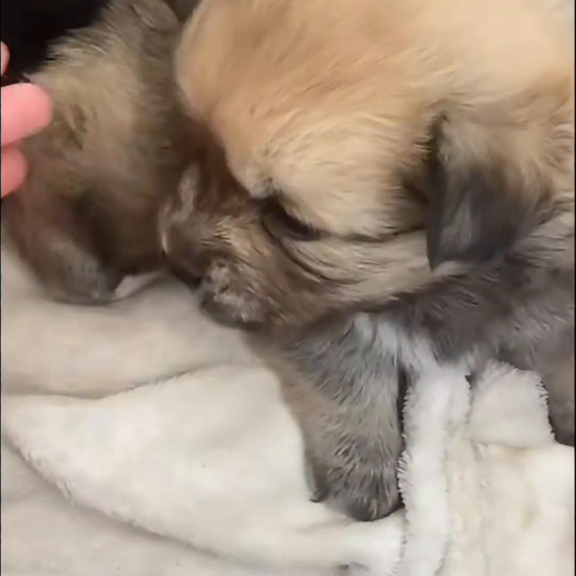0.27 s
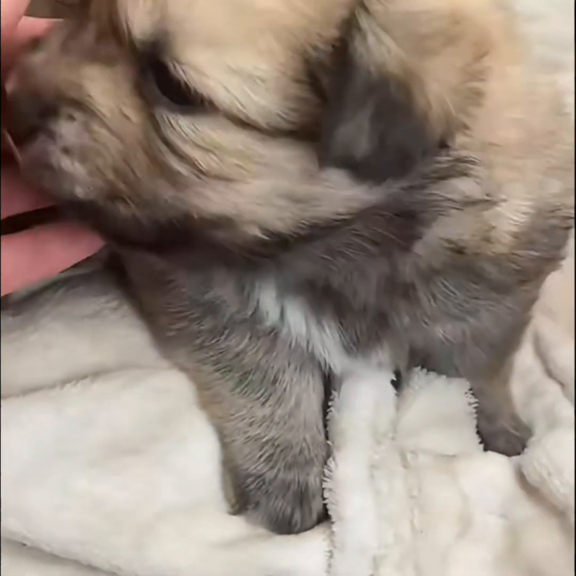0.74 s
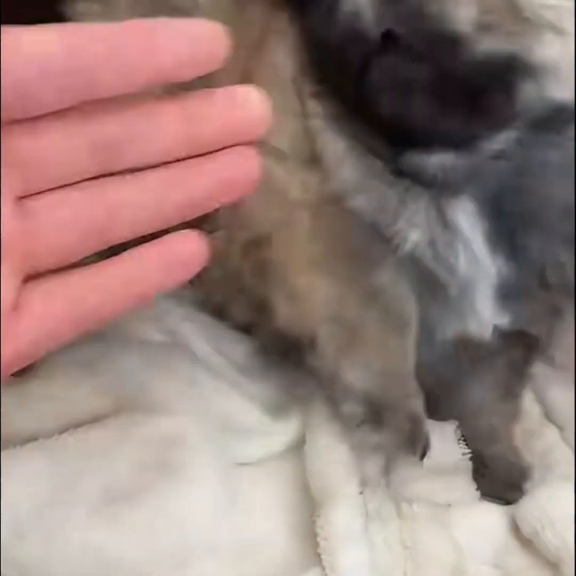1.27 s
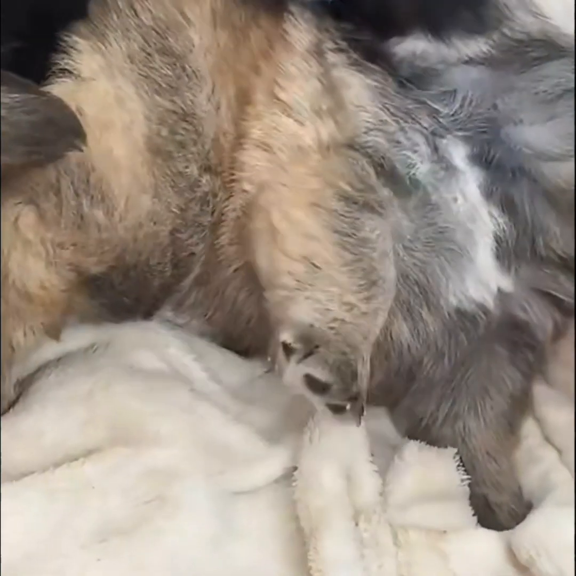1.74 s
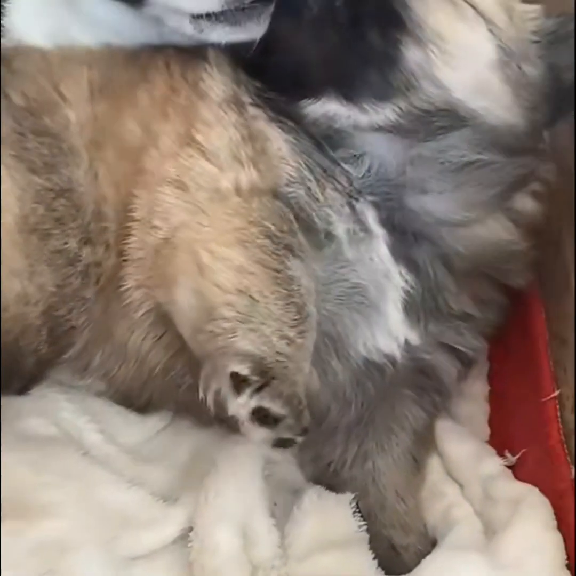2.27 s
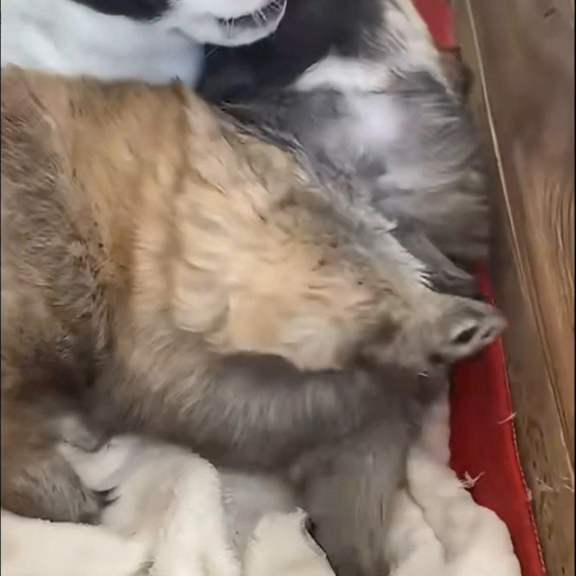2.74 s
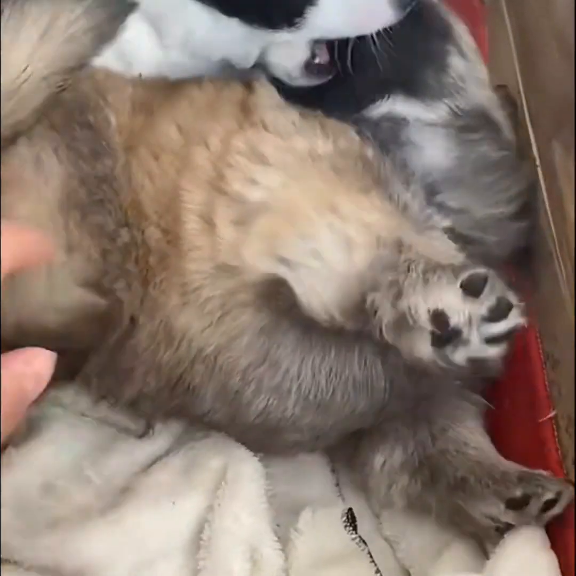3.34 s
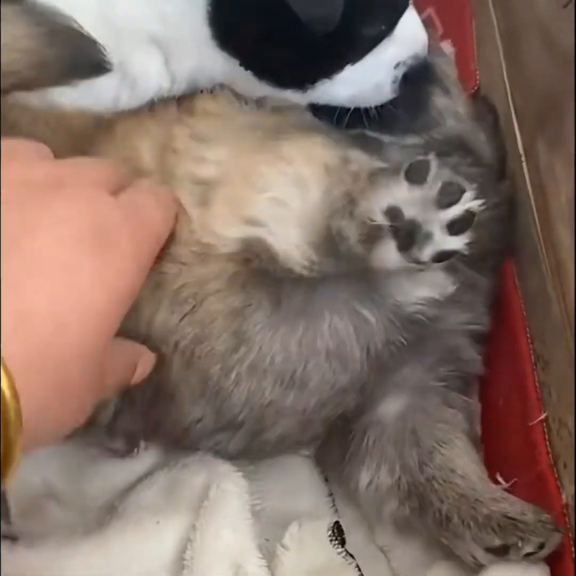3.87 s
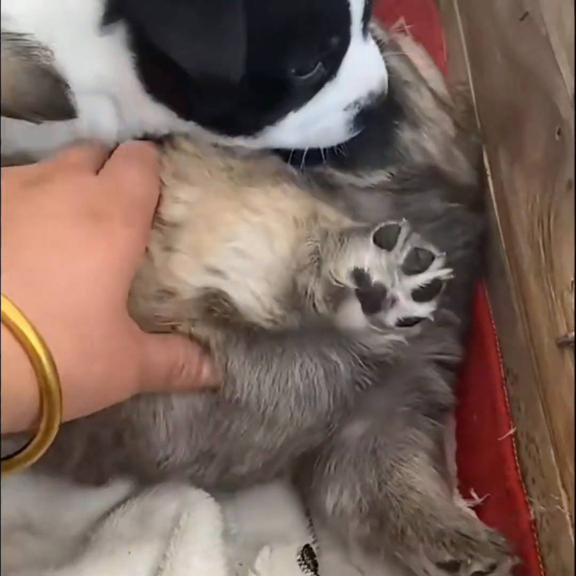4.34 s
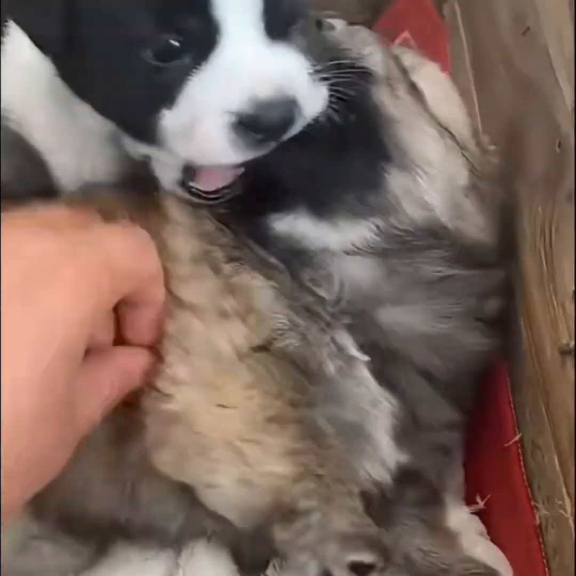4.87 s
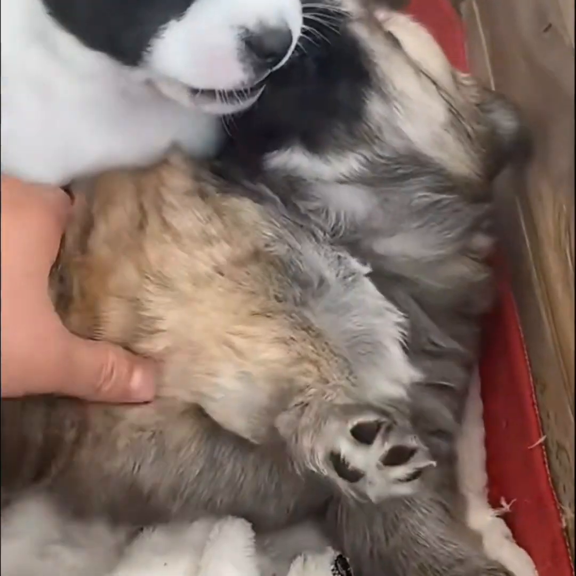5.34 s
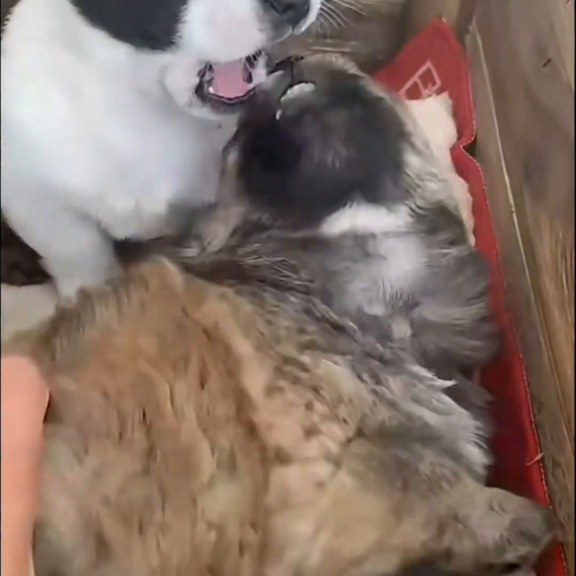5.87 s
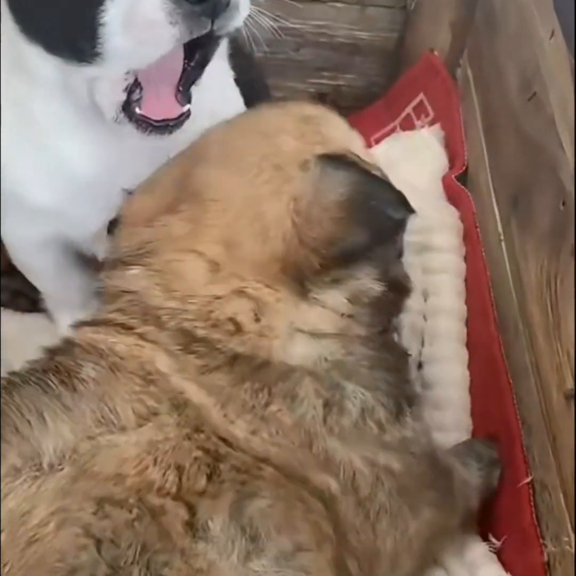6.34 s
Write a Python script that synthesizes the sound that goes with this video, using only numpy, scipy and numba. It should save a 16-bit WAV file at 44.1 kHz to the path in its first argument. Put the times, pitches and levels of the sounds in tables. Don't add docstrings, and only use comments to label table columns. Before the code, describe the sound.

Rapid low puppy growls, raspy and pulsing, repeat about three times a second in a small room, with soft grunts, ticks and cloth scuffs.

```python
import sys
import numpy as np
from scipy import signal
from scipy.fft import rfft, irfft, next_fast_len
from scipy.io import wavfile
from scipy.ndimage import uniform_filter1d, map_coordinates
from numba import njit

SR = 44100
rng = np.random.default_rng(int(sys.argv[2]) if len(sys.argv) > 2 else 0)


def attenuation_scalar(level_db):
    decades = np.asarray(level_db, float) / 20
    return 10 ** decades


def store_wav(level_fs):
    pcm = np.round(np.clip(np.atleast_2d(level_fs), -1, 1) * 32767)
    wavfile.write(sys.argv[1], SR, pcm.T.astype(np.int16))


N = 290619

# (frequency [Hz], level [dB per Hz])
HUM_COLOUR = [(15, -48.5), (25, 3), (193, 0.5), (297, -12.5), (920, -42.5), (1140, -37.5), (2240, -36.5),
              (4150, -48), (4750, -65.5), (5580, -46.5), (8590, -55), (10100, -47), (15500, -77.5)]
# (time [s], level [dB])
HUM_LEVEL = [(0.0, -46.5), (0.09, -37.5), (0.66, -43), (0.79, -59), (1.34, -43.5), (6.59, -46.5)]
# (start [s], length [s], level [dB], centre [Hz])
PAW_SHIFTS = [
    (0.189, 0.034, -43, 4000),
    (0.282, 0.06, -41, 2500),
    (3.044, 0.13, -30.5, 4000),
    (6.02, .15, -39.5, 8000),
]
# (time [s], mouth ring [dB], chest thump [dB])
GRUNT_PULSES = [(0.03, -26, -13.5), (0.101, -14.5, -6.5), (0.141, -23.5, -20), (0.165, -27, -22),
                (0.193, -11.5, -15), (.216, -4, -16), (.238, -28, -19.5), (0.276, -19, -21.5),
                (.298, -13, -20), (0.315, -13, -17), (0.337, -18, -29), (0.398, -18.5, -16),
                (0.42, -22.5, -21), (0.433, -21, -7.5), (0.609, -9.5, -14.5), (0.635, -34, -20),
                (0.652, -38, -31), (.676, -34, -30), (0.706, -20, -38), (.73, -38, -24), (1.881, -4, -12.5),
                (1.915, -6.5, -15.5), (1.95, -3, -15.5), (1.987, -8, -6), (2.797, -28, -32),
                (2.857, -23.5, -27), (2.958, -36.5, -26), (2.996, -25.5, -21.5), (3.773, -19, -13.5),
                (4.681, -23.5, -22)]
# (time [s], peak above 3 kHz [dB], body relative to peak [dB])
SMACKS_AND_TICKS = [(0.189, -28.5, 3.5), (0.61, -44.5, 13), (0.7025, -43.5, 0), (0.9876, -36, 21.5),
                    (0.9987, -50.5, 32.5), (1.0209, -34, 19), (1.211, -19.5, 1), (1.3629, -17, 1),
                    (1.3815, -25.5, 9.5), (1.8424, -28, -4.5), (1.877, -30, -1), (2.2064, -45, 8.5),
                    (2.5503, -28, -45), (2.573, -34.5, 1), (2.846, -43, -7), (3.269, -36.5, 15),
                    (3.3102, -39.5, 16.5), (3.3269, -37.5, 14.5), (3.3527, -35.5, -1), (3.7454, -53, 24),
                    (3.7682, -39, 15), (3.7896, -29, 10.5), (3.8062, -26, 7), (5.4948, -49.5, 15)]
# (start [s], swell [s], length until the push ends [s], chest tone [dB], top pitch [Hz])
GROWL_BURSTS = [(.39, .14, 0.19, -20.5, 254.5), (.757, 0.059, 0.16, -14, 175),
                (1.086, .115, .13, -8.5, 214.8), (1.205, .035, .11, -14.5, 238.4),
                (1.492, 0.046, 0.24, -10, 212.1), (1.9, 0.042, .13, -16, 197.4),
                (2.31, .09, 0.15, -12.5, 200.3), (2.626, 0.041, 0.083, -15.5, 190),
                (3.025, 0.096, 0.17, -12.5, 199.2), (3.393, 0.16, 0.25, -11, 200.5),
                (3.862, .05, .17, -12.5, 236.7), (4.04, 0.072, 0.12, -14, 233.1),
                (4.366, .08, .17, -13.5, 222), (4.71, .06, 0.16, -15, 272.3), (5.082, 0.11, 0.2, -13, 198),
                (5.55, 0.13, 0.21, -12.5, 215), (5.941, .03, 0.13, -15.5, 199.1),
                (6.332, .06, .2, -19, 180)]
# (first pitch [Hz], throat [dB], mouth [dB], breath [dB], lips relative to mouth [dB])
GROWL_VOICES = [(249.25, -35, -43.5, -56, -27), (215, -32.5, -24.5, -48, -31.5),
                (194.4, -21, -20.5, -35.5, -20.5), (222, -18.5, -19.5, -34, -3.5),
                (205.5, -21, -26, -43.5, -13), (175, -23.5, -40.5, -48.5, -34),
                (170.8, -21, -37, -44.5, -7), (180, -22.5, -31.5, -50.5, -10.5),
                (215, -20, -36, -38, -22.5), (190, -20.5, -25.5, -44.5, -20),
                (251.5, -16.5, -20, -38, -13.5), (205.5, -16, -20, -32, -7), (204.7, -15.5, -27, -35, -9),
                (226.1, -15.5, -13.5, -31, -15.5), (190, -19, -33.5, -47.5, -35),
                (203.9, -15.5, -24.5, -40, -2.5), (197, -17.5, -25.5, -38.5, -31),
                (159.4, -28.5, -38.5, -58.5, -48)]
# (frequency [Hz], level [dB per Hz])
BREATH_COLOUR = [(1760, -25), (3000, -2), (3240, 6), (4440, -3), (5060, -4.5), (5730, -1), (6390, -8.5),
                 (7700, -17), (8590, -15.5), (10100, -16.5), (15500, -33)]
# (start [s], length [s], level [dB], first resonance [Hz], last resonance [Hz])
LIP_WHEEZE = (1.495, .24, -37, 4500, 3200)
# (frequency [Hz], lead [radians])
LEFT_LEAD = [(200, .12), (400, .4), (700, .6), (1300, .25), (2500, 1.1), (5000, 1.2), (9000, 1.4),
             (14000, .8)]
# (frequency [Hz], left minus right [dB])
LEFT_TILT = [(200, .5), (700, 2.5), (1400, -.5), (2500, -4), (5000, -.5)]
# (frequency [Hz], level [dB])
WALL_SCATTER = [(300, -30), (700, -19), (1400, -22), (3000, -9), (10000, -6)]
# (frequency [Hz], time to fall 60 dB [s])
ROOM_DECAY = [(150, 0.81), (800, 0.48), (2500, 0.38), (10000, 0.12)]

# (start below top [dB], sag by the push's end [dB], drop as it ends [dB], fade [dB per s])
TONE_SHAPE, THROAT_SHAPE = (8.3, 4.64, 2.7, 154), (2.7, 4.6, 11.8, 190)
MOUTH_SHAPE, BREATH_SHAPE = (3, 6, 8, 130), (6, 3.4, 9.12, 96)
ATTACK_S, DROP_S = .014, .0098
REST_HZ, SLACK, SETTLE_S = 164.06, .45, .09
ROUGH = .35


def unit(x):
    return x / np.sqrt(np.mean(x ** 2) + 1e-20)


def even(x, seconds=0.046):
    size = max(int(seconds * SR), 1)
    power = uniform_filter1d(uniform_filter1d(x * x, size), size)
    return x / np.sqrt(np.abs(power) + 1e-12)


def soft(x):
    return uniform_filter1d(x, round(ATTACK_S * SR))


def along(points, hz):
    f, v = np.transpose(points)
    return np.interp(np.log(hz + 1), np.log(f + 1), v)


def wobble(rate):
    knots = rng.standard_normal(int(N * rate / SR) + 4)
    return map_coordinates(knots, [np.arange(N) * rate / SR])


def filtered(x, response):
    m = next_fast_len(N + SR // 2)
    return irfft(rfft(x, m) * response(np.fft.rfftfreq(m, 1 / SR)), m)[..., :N]


def band(x, low_hz, high_hz, order=4):
    return signal.sosfilt(signal.butter(order, [low_hz, high_hz], "band", fs=SR, output="sos"), x)


@njit
def resonate(x, turn, keep):
    y = np.zeros(len(x))
    for i in range(2, len(x)):
        y[i] = x[i] + 2 * keep * np.cos(turn[i]) * y[i - 1] - keep * keep * y[i - 2]
    return y


def cavity(x, hz, width_hz):
    return resonate(x, 2 * np.pi * hz / SR, np.exp(-np.pi * width_hz / SR))


def box(x):
    t = np.arange(SR // 40) / SR
    walls = attenuation_scalar(-60 * t / .03) * rng.standard_normal((2, len(t)))
    walls = walls / np.linalg.norm(walls[0])
    first, second = signal.fftconvolve(x[None], walls, axes=1)[:, :N]
    turn = 3 * wobble(7)
    return x + np.cos(turn) * first + np.sin(turn) * second


def floor():
    s, db = np.transpose(HUM_LEVEL)
    noise = rng.standard_normal((2, N))
    mid, side = filtered(noise, lambda f: attenuation_scalar(along(HUM_COLOUR, f)) / (1 + (52 / (f + 1)) ** 4))
    level_db = np.interp(np.arange(N) / SR, s, db) + 9.5
    lumps = attenuation_scalar(level_db + 1.3 * wobble(7.1) + 0.5 * wobble(3.54))
    return lumps * unit(np.array([mid + 0.031 * side, mid - 0.031 * side]))


def fibres(hz):
    noise = band(rng.standard_normal((2, N)), hz / 3, min(hz * 1.4, 16000), order=1)
    return unit(noise * attenuation_scalar(0.85 * wobble(90) + 0.67 * wobble(24)))


def bedding():
    t = np.arange(N) / SR
    shifts = np.zeros((2, N))
    for s, length, db, hz in PAW_SHIFTS:
        swell = np.sin(np.pi * np.clip((t - s) / length, 0, 1))
        shifts += attenuation_scalar(db) * swell * fibres(hz)
    settling = attenuation_scalar(-57.5 - 32.5 * t + 4 * wobble(10)) * (t < 0.93)
    return shifts + settling * fibres(4500)


def grunts():
    out, t = np.zeros(N + SR), np.arange(SR // 10) / SR
    rise = np.sin(np.pi / 2 * np.minimum(t / 0.006, 1)) ** 2
    fall = 85 * t + 480 * .007 * (1 - np.exp(-t / .007))
    thump = attenuation_scalar(-60 * t / 0.085) * np.sin(2 * np.pi * fall)
    ring_hz = 545 * (1 + .04 * rng.standard_normal(len(GRUNT_PULSES)))
    for (s, db, thump_db), hz in zip(GRUNT_PULSES, ring_hz):
        ring = np.sin(2 * np.pi * hz * t) + 0.17 * np.sin(2 * np.pi * 1.273 * hz * t)
        ring = attenuation_scalar(-60 * t / 0.019) * ring
        pulse = rise * (attenuation_scalar(db + 13.5) * ring + attenuation_scalar(thump_db) * thump)
        out[round((s - .002) * SR):][:len(t)] += pulse
    return out[:N]


def ticks():
    edge, body, t = np.zeros(N + SR), np.zeros(N + SR), np.arange(SR // 30) / SR
    noises = rng.standard_normal((len(SMACKS_AND_TICKS), len(t)))
    for (s, db, body_db), noise in zip(SMACKS_AND_TICKS, noises):
        puff = attenuation_scalar(db - 60 * t / 0.011) * (1 - np.exp(-t / 0.0008)) * noise
        edge[round(s * SR):][:len(t)] += puff
        body[round(s * SR):][:len(t)] += attenuation_scalar(body_db) * puff
    bright = attenuation_scalar(11.5) * band(edge[:N], low_hz=3200, high_hz=8360, order=2)
    dull = attenuation_scalar(17.0) * band(body[:N], low_hz=1200, high_hz=3080, order=2)
    return bright + dull


def fold_snaps(cycles, half):
    chance = rng.standard_normal((2000, 2))[:int(cycles[-1])]
    at = np.searchsorted(cycles, np.arange(len(chance)) + .6).clip(0, N - 1)
    size = attenuation_scalar(8 * ROUGH * chance[:, 0]) * (1 - half[at] * (np.arange(len(at)) % 2))
    late = (ROUGH * .0006 * SR * chance[:, 1]).astype(int)
    snaps = np.bincount(np.clip(at + late, 0, N - 1), size, N)
    return snaps + .55 * np.roll(snaps, round(.0023 * SR))


def growl():
    t = np.arange(N) / SR
    rows = np.hstack([GROWL_BURSTS, GROWL_VOICES])
    which = np.searchsorted(rows[:, 0], t) - 1
    now = rows[np.maximum(which, 0)].T
    start, rise, length, top_db, top_hz, first_hz, throat_db, mouth_db, breath_db, lip_db = now
    age = t - start
    before = np.clip(1 - age / rise, 0, 1)
    after = np.clip((age - rise) / np.maximum(length - rise, .01), 0, 1)
    over = np.maximum(age - length, 0)

    def gain(db, under, sag, drop, fade):
        db = db - under * before ** 2 - sag * after ** 2
        db = db - drop * (1 - np.exp(-over / DROP_S)) - fade * over
        return soft((which >= 0) * attenuation_scalar(db))

    tense = (1 - SLACK * after) * np.exp(-over / SETTLE_S)
    hz = soft(REST_HZ + (top_hz - REST_HZ) * tense + (first_hz - top_hz) * before)
    throb = soft(np.clip(.68 - .006 * (top_hz - REST_HZ), .2, .7))
    half = np.where(which < 1, .9, .1)
    flap = np.cos(2 * np.pi * np.cumsum(29.0 * (1 + .12 * wobble(10))) / SR)
    lopsided = .45 * (2 * flap ** 2 - 1) * wobble(9)
    swell = even(1 + throb * (flap + lopsided))
    cycles = np.cumsum(hz * (1 + .06 * flap * throb + .03 * wobble(70))) / SR
    tone = np.sin(2 * np.pi * cycles) + half ** 2 * np.sin(np.pi * cycles)
    tone = np.sqrt(2) * tone * attenuation_scalar(2.2 * wobble(45) - 1.5)
    octave = attenuation_scalar(-22.5 + 1.2 * wobble(30)) * np.sin(4 * np.pi * cycles)

    snaps = fold_snaps(cycles, half)
    gate = .4 + (.5 + .5 * np.cos(2 * np.pi * (cycles - .7))) ** 2
    hiss = unit(gate * rng.standard_normal((3, N)))
    voiced = np.sqrt(1 - ROUGH) * even(snaps - snaps.mean())
    drive = [voiced + np.sqrt(ROUGH) * air for air in hiss]

    throat = box(cavity(drive[0], np.full(N, 827.0), width_hz=400))
    throat = even(band(throat, low_hz=280, high_hz=1120, order=5)) + octave
    chest_hz = soft(428 - 5 * np.clip(200 - top_hz, 0, 24))
    chest = even(band(cavity(drive[0], chest_hz, width_hz=70), low_hz=250, high_hz=480))

    mouth_hz = 1987 * (1 + .06 * wobble(5))
    mouth = cavity(drive[1], .86 * mouth_hz, width_hz=650)
    mouth = box(cavity(mouth, 1.15 * mouth_hz, width_hz=500))
    lips = soft(attenuation_scalar(lip_db)) * even(band(mouth, low_hz=2413, high_hz=3100, order=3))
    mouth = even(band(mouth, low_hz=1391, high_hz=2500, order=6)) + lips

    breath = even(filtered(box(drive[2] + hiss[2]), lambda f: attenuation_scalar(along(BREATH_COLOUR, f))))
    palate = soft(attenuation_scalar(-5.5 + .4 * (lip_db + 15))) * band(breath, low_hz=2900, high_hz=4450, order=6)
    middle = band(breath, low_hz=5150, high_hz=8500, order=6)
    teeth = attenuation_scalar(2.34) * band(breath, low_hz=8500, high_hz=15500)
    breath = even(palate + middle + teeth)

    low = gain(top_db, *TONE_SHAPE) * tone * swell
    low += gain(throat_db, *THROAT_SHAPE) * throat * np.abs(swell) ** 0.1
    low += gain((top_db + throat_db) / 2 - 7, *THROAT_SHAPE) * chest * np.abs(swell)
    bark_db = 2 * np.exp(-np.abs(age) / 0.056)
    high = gain(mouth_db + bark_db, *MOUTH_SHAPE) * mouth + gain(breath_db, *BREATH_SHAPE) * breath
    return low + high * attenuation_scalar(1.15 * wobble(40))


def wheeze():
    s, length, db, first_hz, last_hz = LIP_WHEEZE
    done = np.clip((np.arange(N) / SR - s) / length, 0, 1)
    hz = first_hz + (last_hz - first_hz) * done
    air = cavity(rng.standard_normal(N), hz, width_hz=700)
    air = even(cavity(air, hz, width_hz=700))
    return attenuation_scalar(db) * np.minimum(done / 0.078, 1) * (1 - done) * air


def room(x):
    hz, t, z = signal.stft(rng.standard_normal((2, SR // 2)), SR, nperseg=256)
    apart = np.clip(hz / 2500, 0, 1)[:, None]
    z = np.array([z[0] + apart * z[1], z[0] - apart * z[1]])
    decay = attenuation_scalar(-60 * t / along(ROOM_DECAY, hz)[:, None])
    tail = signal.istft(z * decay, SR, nperseg=256)[1]
    return signal.fftconvolve(x[None], tail / np.linalg.norm(tail[0]), axes=1)[:, :N]


def scene():
    hum, rustle = floor(), bedding()
    near = grunts() + ticks() + growl() + wheeze()
    half = np.array([[.5], [-.5]])

    def sides(f):
        return attenuation_scalar(half * along(LEFT_TILT, f)) * np.exp(1j * half * along(LEFT_LEAD, f))

    ports = filtered(near, sides)
    echoes = box(near) - near
    ports = ports + 2 * half * filtered(echoes, lambda f: attenuation_scalar(along(WALL_SCATTER, f)))
    return ports + attenuation_scalar(-10) * room(near) + hum + rustle


def thinned(x, start_hz, holes, valley, depth_db, sparse):
    hz, _, z = signal.stft(x, SR, nperseg=1536)
    power, width = np.abs(z) ** 2 + 1e-14, 10
    local = np.abs(uniform_filter1d(power, width, 1))
    around = np.abs(uniform_filter1d(power, 70, 1))
    under_db = 10 * np.log10(uniform_filter1d(around / local, 3, 2))
    field = unit(uniform_filter1d(rng.standard_normal(z.shape), 9, 2))
    field = unit(0.55 * field[0] + field)
    field = field + valley * np.clip(under_db, 0, 12) * np.clip(hz[:, None] / 1200 - 2.4, .25, 1)
    field = field[:, np.arange(len(hz)) // width * width]
    band_keep = 1 / (1 + np.exp(6 * (field - holes)))
    keep = band_keep / (1 + (sparse ** 2 * local / power) ** 2)
    gain = np.maximum(keep, attenuation_scalar(depth_db)) * attenuation_scalar(7)
    blend = np.clip((hz[:, None] - start_hz) / 200, 0, 1)
    return signal.istft(z * (1 - blend + blend * gain), SR, nperseg=1536)[1][:, :N]


def roll_off(x):
    return signal.sosfilt(signal.butter(12, 15670, fs=SR, output="sos"), x)


def record(dry):
    x = dry / (1 + np.abs(dry / 1.12) ** 5) ** (1 / 5)
    x = thinned(x, start_hz=2650, holes=1.0, valley=.3, depth_db=-45, sparse=1.15)
    x = filtered(x, lambda f: f < 15680)
    return roll_off(x)


dry = scene()
out = record(dry)
store_wav(out)
```